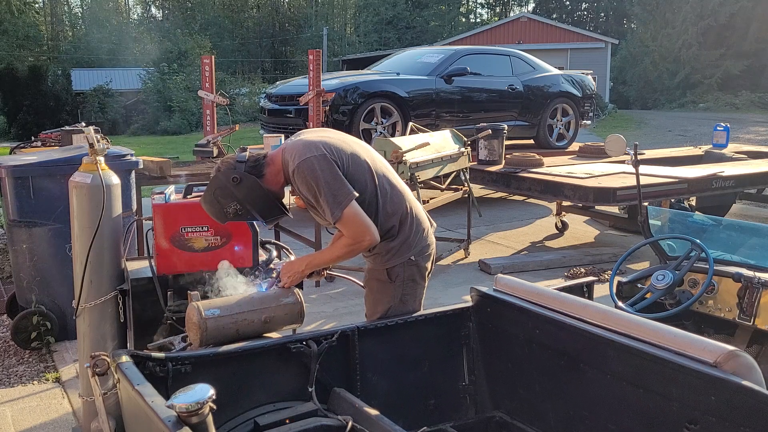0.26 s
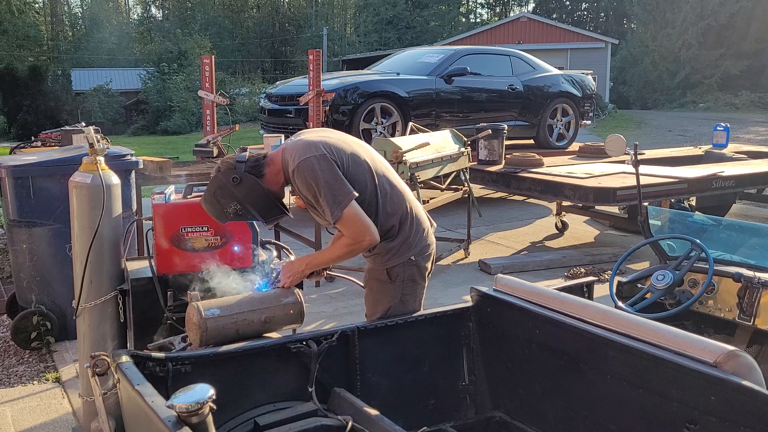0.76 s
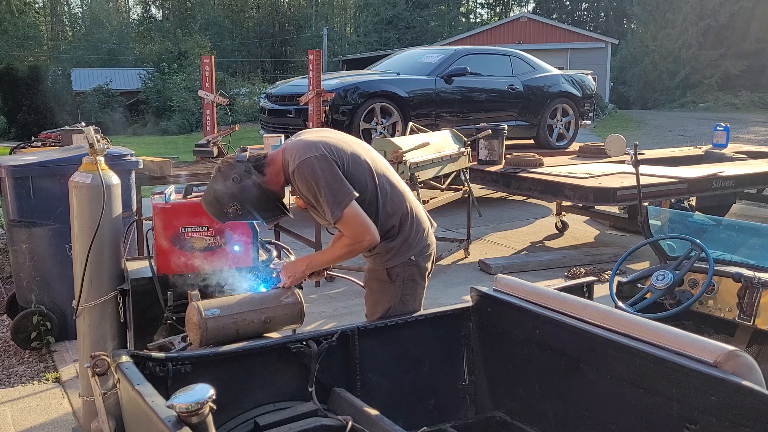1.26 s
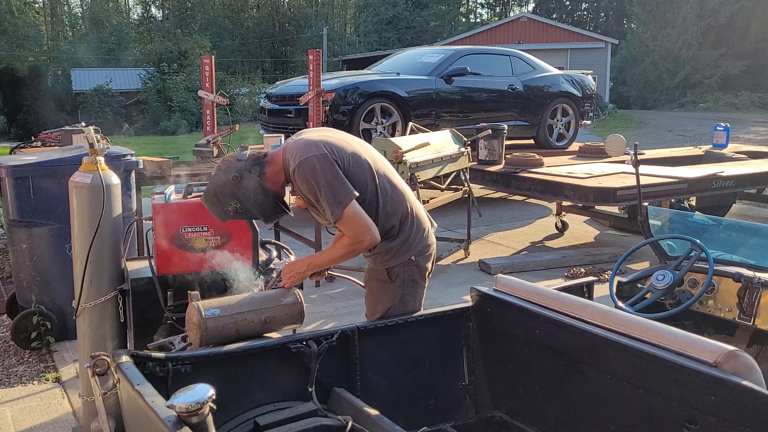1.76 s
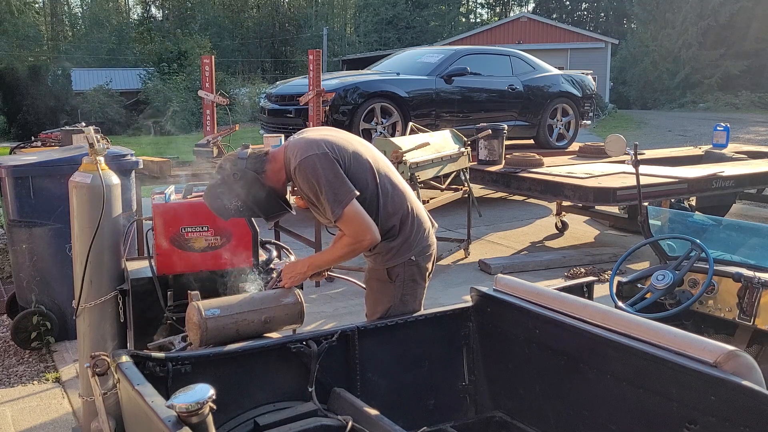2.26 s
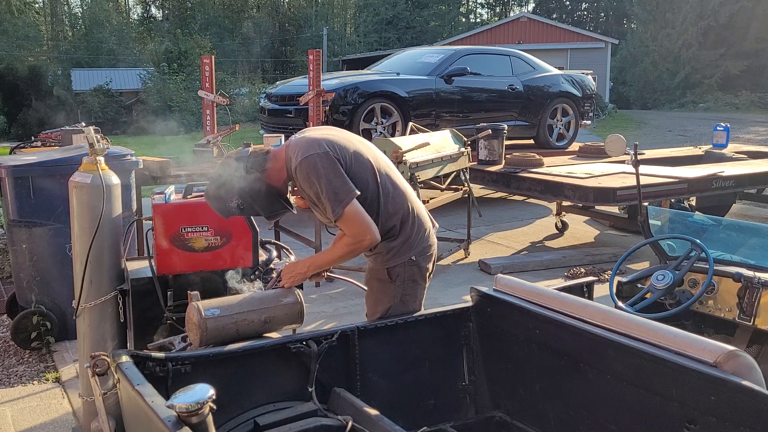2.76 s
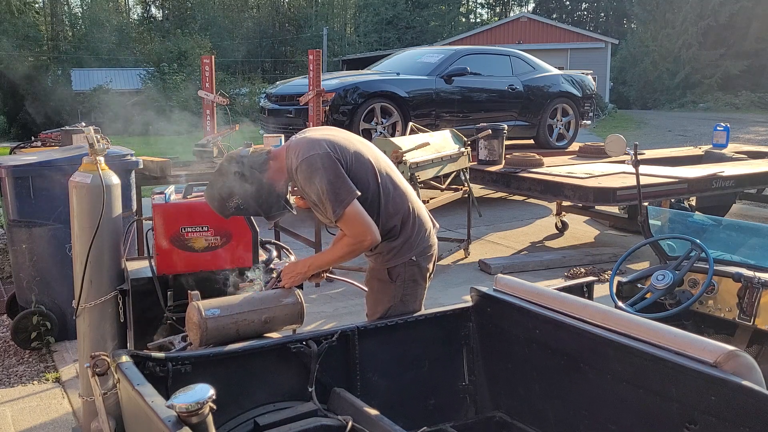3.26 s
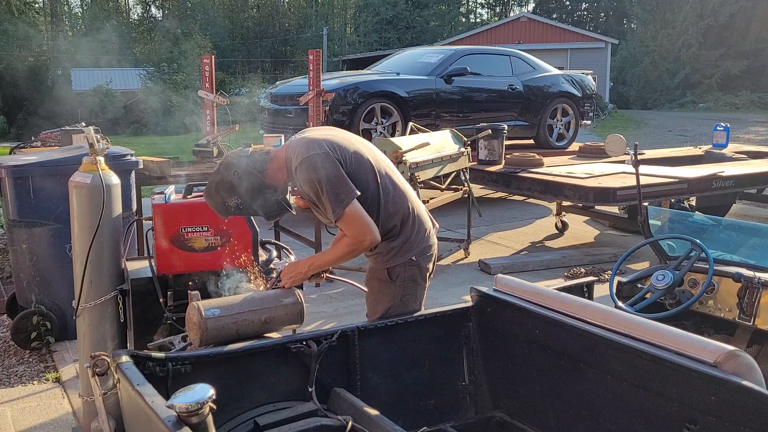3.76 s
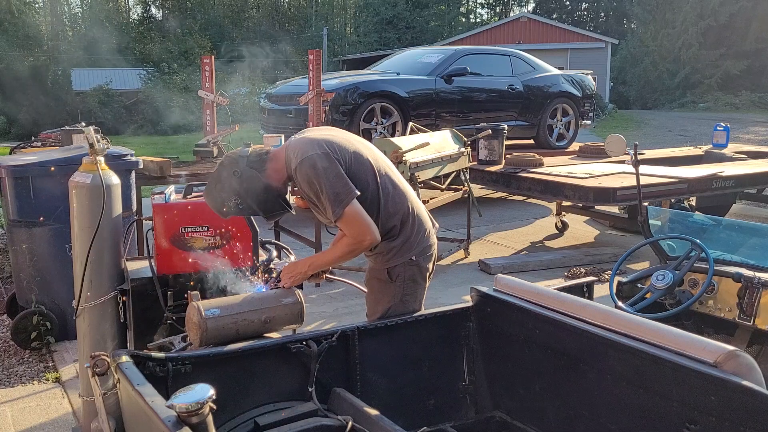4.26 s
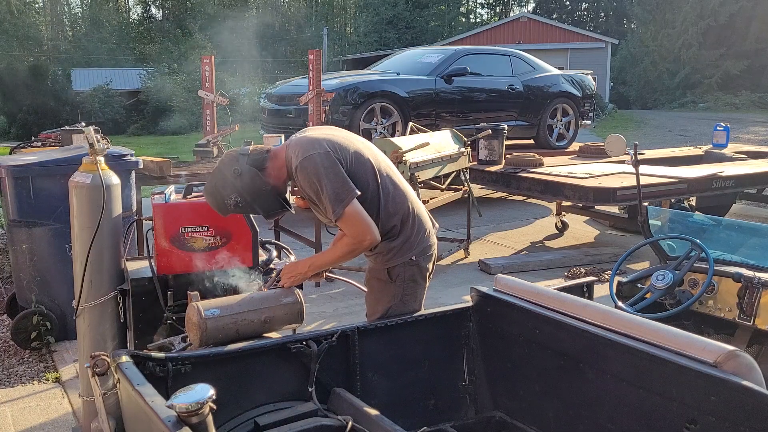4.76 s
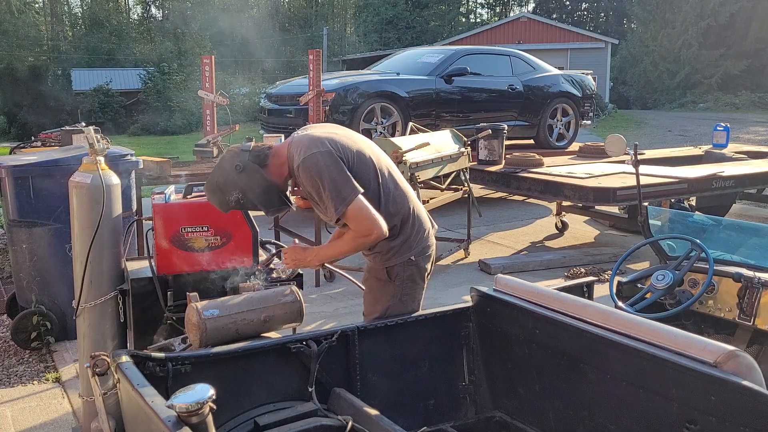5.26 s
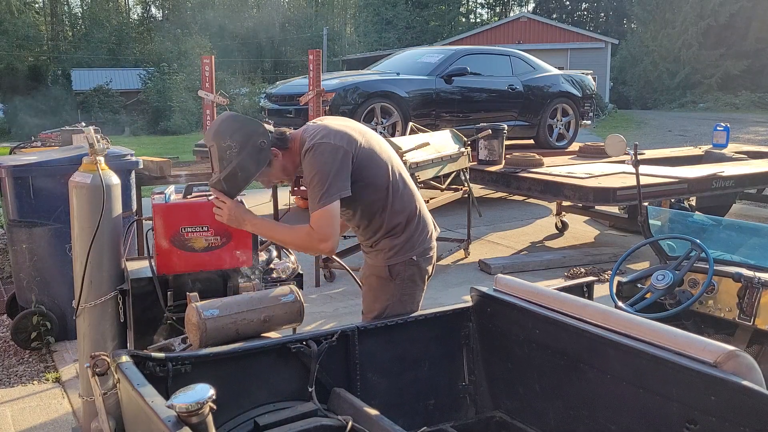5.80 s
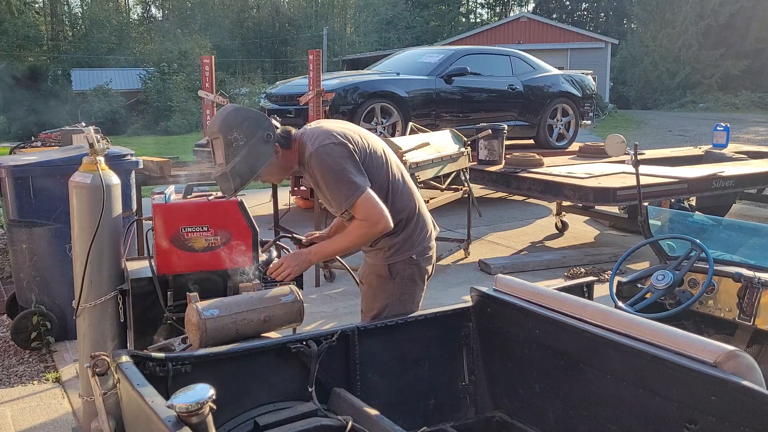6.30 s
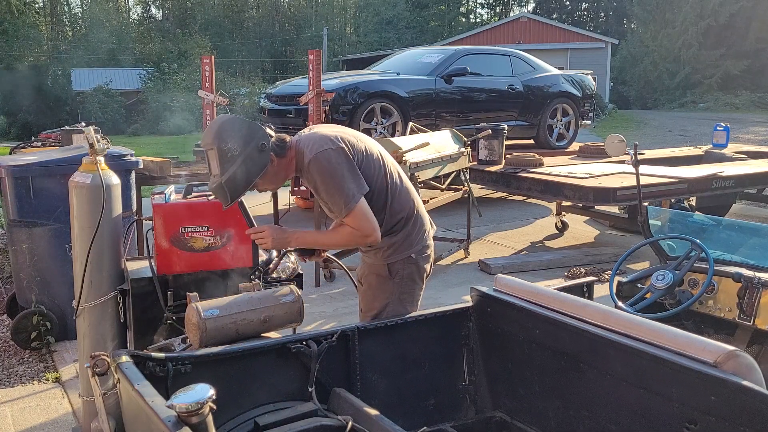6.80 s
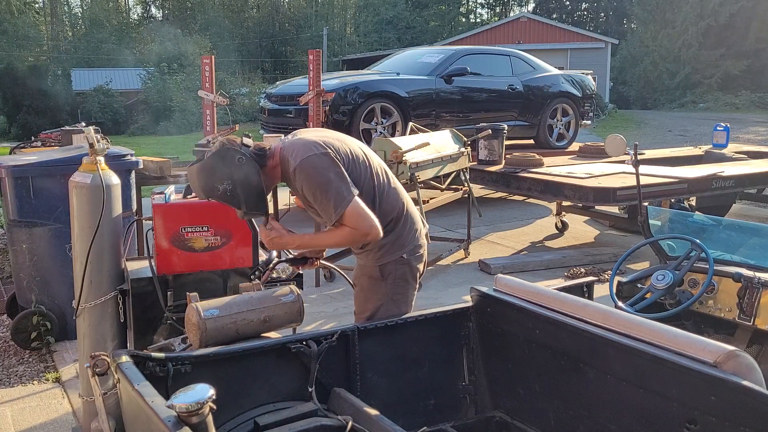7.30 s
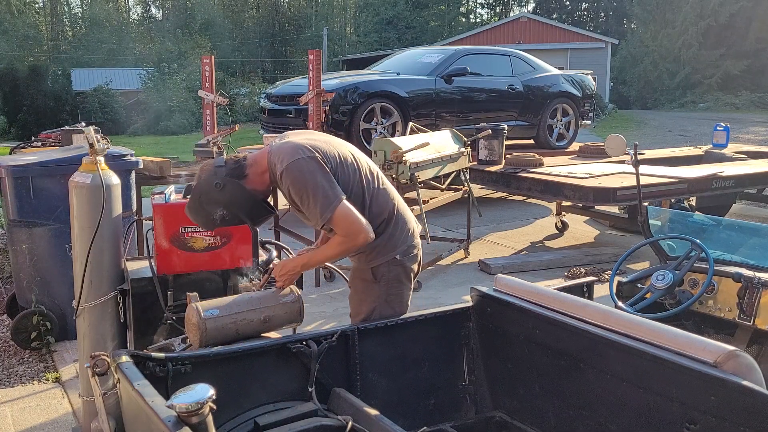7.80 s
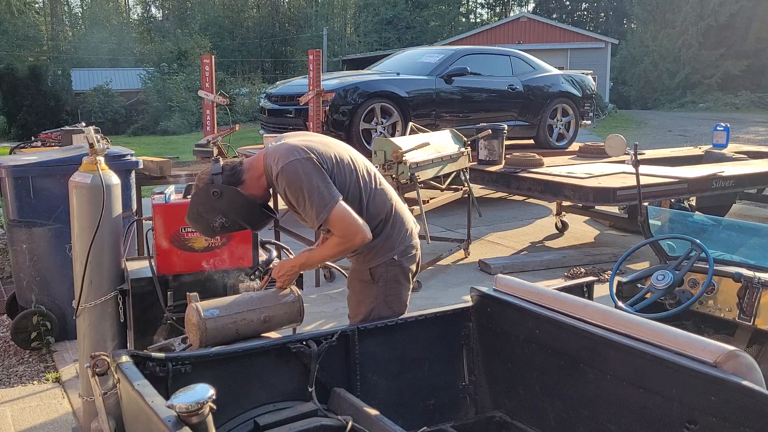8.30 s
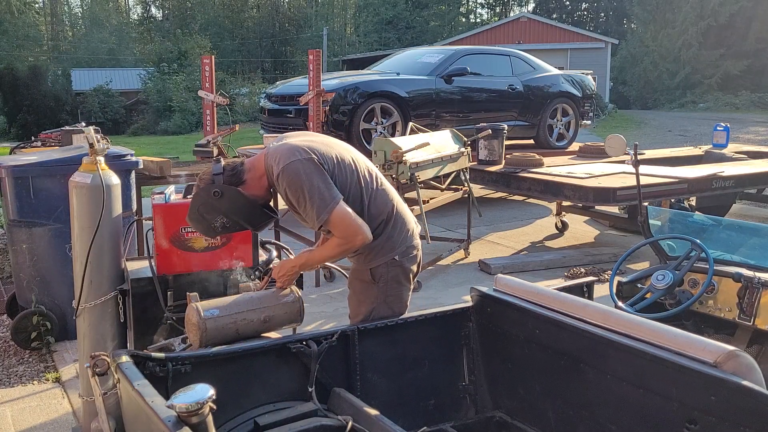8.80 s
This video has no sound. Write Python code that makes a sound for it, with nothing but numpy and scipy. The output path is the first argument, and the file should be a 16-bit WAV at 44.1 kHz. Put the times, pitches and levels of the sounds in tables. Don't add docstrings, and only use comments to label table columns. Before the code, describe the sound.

In an open yard, close stereo microphones hear wire welding slightly left. From 0 to 0.8 s, sharp snaps come about eighty to a hundred per second over grainy sizzle, with a feed-motor whine and sagging fan hum; the hiss fades near 1 s. A loud short restrike comes at 1.23-1.3 s with a soft bench thud. Then fan hum recovers over faint road rumble; tiny rough high chirps sound around 2.7-3.1 s. At 3.2 s metal ticks and a gas spit precede flares, and from 3.5 to 4.55 s a louder bead crackles, strongest near 4.3 s, echoing off ground and clutter. Tyre hiss swells near 3.9 s. Afterwards a distant engine, dropped in pitch, throbs low, swelling from 6 s and booming around 7.2 s with a faint rattle and light ticks. It drones on; a chirp, clicks and gas puff come near 8.9 s.

```python
import sys
import numpy as np
from scipy import signal
from scipy.fft import rfft, irfft, next_fast_len
from scipy.io import wavfile
from scipy.ndimage import uniform_filter1d, map_coordinates

SR = 44100
rng = np.random.default_rng(int(sys.argv[2]) if len(sys.argv) > 2 else 0)


def boost(x):
    u = np.asarray(x, float) / 20
    return 10 ** u


def dump(signal):
    limited = np.clip(np.atleast_2d(signal).T, -1, 1)
    pcm = np.round(limited * 32767).astype(np.int16)
    wavfile.write(sys.argv[1], SR, pcm)


N = 399105
T = np.arange(N) / SR
SIZE = next_fast_len(N + SR)
HZ = np.maximum(np.arange(SIZE // 2 + 1) * SR / SIZE, 1)
DULL = 1 / (1 + (HZ / 3600) ** 4)


def unit(x):
    return x / np.sqrt(np.mean(x ** 2) + 1e-20)


def in_time(rows):
    s, *columns = np.transpose(rows)
    return [np.interp(T, s, c) for c in columns]


def at_hz(points):
    hz, value = np.array(points).T
    return np.interp(np.log(HZ), np.log(hz), value)


def through(x, response):
    return irfft(rfft(x, SIZE) * response, SIZE)[..., :N]


def delay(ms):
    return np.exp(-2j * np.pi * HZ * ms / 1000)


def drift(rate_hz):
    knots_per_s = 40
    knots = rng.standard_normal(int(N / SR * knots_per_s) + 2)
    r = np.exp(-2 * np.pi * rate_hz / knots_per_s)
    smooth = unit(signal.lfilter([1], [1, -r], knots))
    return np.interp(T * knots_per_s, np.arange(len(knots)), smooth)


def fade(t60_s):
    return [1], [1, -boost(-60 / (t60_s * SR))]


def tones(hz, orders, wobble_db):
    spread_rad = .24
    turn = 2 * np.pi * np.cumsum(hz) / SR
    out = 0
    for k, db in orders:
        out = out + boost(db + wobble_db * drift(6.5)) * np.sin(k * turn + spread_rad * k * k)
    return np.sqrt(2) * out


def snaps():
    # t/s, peak level/dB
    first_bead = [(0.0023, -10.1), (0.0223, -10.2), (0.0374, -10.8), (0.0553, -10.7), (0.07, -11.8),
                  (0.09, -9.4), (0.0992, -11.9), (0.1084, -8.8), (0.122, -13.3), (0.1366, -15.1),
                  (0.1512, -14.2), (0.1635, -14.1), (0.1711, -15.6), (0.1826, -16.1), (0.193, -14.3),
                  (0.202, -14.5), (0.2136, -18.7), (0.2266, -16.9), (0.2369, -12.8), (0.2462, -17.9),
                  (0.2622, -12.6), (0.2767, -14.6), (0.2909, -14.0), (0.3052, -12.3), (0.32, -16.3),
                  (0.3374, -14.3), (0.3521, -16.6), (0.3674, -13.5), (0.3835, -15.3), (0.4025, -15.2),
                  (0.4208, -13.9), (0.4378, -19.0), (0.4459, -21.6), (0.4559, -19.0), (0.467, -21.0),
                  (0.4806, -18.9), (0.4916, -13.8),
                  (0.5005, -19.1), (0.5069, -19.2), (0.5168, -14.3), (0.5228, -16.1), (0.5311, -17.9),
                      (0.5416, -11.1), (0.5547, -15.6), (0.5638, -16.2), (0.5739, -14.4), (0.5815, -15.2),
                      (0.5911, -15.6), (0.603, -6.8), (0.6115, -12.1), (0.6192, -16.5), (0.6312, -12.9),
                      (0.6389, -15.9), (0.65, -15.5), (0.6579, -14.2), (0.6681, -13.5), (0.6748, -15.6),
                      (0.6863, -12.1), (0.6925, -13.6), (0.7015, -14.7), (0.7103, -17.4), (0.7217, -14.9),
                      (0.7308, -13.7), (0.7425, -14.8), (0.7493, -16.8), (0.7604, -15.3), (0.7724, -13.8),
                      (0.7873, -12.5), (0.8034, -10.4), (0.8229, -13.9), (1.0075, -24.3), (1.0685, -17),
                      (1.2332, -7.1), (1.2494, -6.5), (1.2594, -13.2), (1.2694, -11.3), (1.2791, -10.3),
                      (1.2894, -11.8), (1.2987, -10.9)]
    # t/s, peak level/dB
    second_bead = [(3.3775, -11.2), (3.4256, -21.1), (3.5158, -12.0), (3.553, -10.3), (3.5651, -13.2),
                   (3.5715, -13.1), (3.5776, -14.4), (3.5843, -11.9), (3.5916, -11.9), (3.5989, -14.0),
                   (3.606, -11.8), (3.6128, -11.5), (3.6191, -9.4), (3.6262, -10.6), (3.6338, -13.3),
                   (3.6411, -15.4), (3.6528, -11.4), (3.659, -10.5), (3.6722, -9.6), (3.6879, -7.9),
                   (3.6993, -14.5), (3.714, -12.5), (3.7281, -11.0), (3.7426, -10.0), (3.7617, -7.7),
                   (3.7695, -9.6), (3.7774, -8.5), (3.7902, -14.2), (3.8029, -10.9), (3.8098, -9.8),
                   (3.8176, -11.4), (3.8262, -13.1), (3.8348, -13.4), (3.8433, -9.7), (3.8517, -8.5),
                   (3.8597, -13.2), (3.8682, -10.2), (3.8767, -13.5), (3.885, -10.9), (3.8996, -7.7),
                   (3.9167, -8.0), (3.9497, -8.9), (3.9862, -8.5),
                   (4.0066, -6.8), (4.025, -9.6), (4.0366, -10.8), (4.0526, -8.8), (4.0664, -9.8),
                       (4.0783, -10.3), (4.0883, -11.2), (4.0993, -13.7), (4.1089, -9.8), (4.1199, -9.1),
                       (4.1297, -12.1), (4.1398, -9.5), (4.1496, -8.8), (4.1596, -13.2), (4.1697, -6.8),
                       (4.1805, -6.7), (4.1933, -9.1), (4.205, -9.9), (4.2146, -12.3), (4.2258, -6.6),
                       (4.2359, -5.3), (4.2487, -6.6), (4.2661, -7.9), (4.2847, -3.5), (4.2961, -12.7),
                       (4.3079, -7.1), (4.3168, -13.0), (4.3265, -8.2), (4.3368, -12.9), (4.3457, -12.0),
                       (4.352, -10.7), (4.3641, -15.5), (4.3714, -17.7), (4.3796, -14.4), (4.3906, -15.8),
                       (4.3993, -14.7), (4.4097, -9.2), (4.4192, -11.3), (4.4282, -20.0), (4.4368, -19.2),
                       (4.4424, -17.0), (4.4589, -16.3), (4.4654, -13.1), (4.472, -17.4), (4.4823, -16.3),
                       (4.4884, -13.6), (4.4942, -15.3), (4.5007, -15.3), (4.5167, -14.0), (4.5246, -17.4),
                       (4.5346, -16.0), (4.5426, -15.1), (4.5549, -10.2)]
    snap_db, twin_share, twin_ms = -2.5, .22, .25
    s, db = np.transpose(first_bead + second_bead)
    clicks, twins = np.zeros((2, N))
    at = np.round(s * SR + rng.uniform(-2.5, 2.5, len(s))).astype(int)
    clicks[at] = boost(db + snap_db)
    late = (rng.uniform(.15, 1, len(s)) * twin_ms / 1000 * SR).astype(int)
    twins[at + late] = clicks[at] * twin_share * rng.standard_normal(len(s))
    return clicks, twins


def burn():
    # t/s, sizzle level/dB
    first_burn = [(0, -32), (.2, -31), (.4, -34.5), (.6, -32), (.83, -33), (.87, -40.5), (.95, -52),
                  (1.02, -40), (1.06, -64), (1.1, -99)]
    # t/s, sizzle level/dB
    restrike = [(1.06, -80), (1.19, -55), (1.229, -44), (1.24, -23), (1.301, -28), (1.35, -46), (1.5, -73),
                (1.701, -99)]
    # t/s, sizzle level/dB
    second_burn = [(3.369, -93), (3.44, -52), (3.56, -26.5), (3.9, -27), (4.2, -32.5), (4.402, -29.5),
                   (4.549, -28.5), (4.601, -51), (4.9, -99)]
    return sum(boost(in_time(rows)[0]) for rows in (first_burn, restrike, second_burn))


def arc():
    # f/Hz, density/(dB per Hz)
    shock_colour = [(250, -12), (1000, -9.5), (1800, -7), (3300, -8.5), (4800, -6.5), (6300, 1), (8300, -1),
                    (9700, .5), (11800, -5), (13600, 1), (15000, 0), (15700, 4)]
    # f/Hz, density/(dB per Hz)
    sizzle_colour = [(300, -26), (1000, -20), (2000, -20), (3400, -13), (4800, -14.5), (9000, -13),
                     (11800, -10), (13200, -9), (15000, -12), (15700, -8)]
    # t/s, gain/dB
    puddle = [(0, -2.5), (.2, -0.5), (.4, -1), (.6, -3), (.82, 0.5), (1.0, 1), (1.07, 1), (1.23, 6),
              (1.3, 4), (3.38, 2), (3.6, 0), (3.8, 0.5), (4.0, 2), (4.15, 0), (4.28, 1), (4.4, -0.5),
              (4.5, 1), (4.54, 4)]
    # t/s, level/dB, rise/s, t60/s, tilt/(dB per octave)
    flares = [
        (.915, -40, 0.0092, 0.39, 6.5),
        (1.009, -50, .002, .08, -9),
        (1.07, -45, 0.0033, 0.12, -2.5),
        (1.193, -34, 0.016, 0.23, 1),
        (3.387, -24.5, 0.002, 0.14, 0.5),
        (3.526, -19.5, 0.0028, 0.058, -0.5),
    ]
    clicks, twins = snaps()
    shock = 1j * boost(at_hz(shock_colour) + 10.5)
    shocks = through(clicks + twins, shock * (1 - DULL))
    push = np.sqrt(clicks * boost(-15)) * boost(in_time(puddle)[0])
    shocks = shocks + through(push, shock * DULL)

    stirred = signal.lfilter(*fade(.045), np.roll(clicks, -60) + 1e-18)
    stirred = uniform_filter1d(stirred, size=120)
    upcoming = np.roll(clicks, -90)[::-1] > 0
    shorted = signal.lfilter(*fade(.035), upcoming + 1e-18)[::-1]
    flicker_db = 1.5 * drift(12)
    level = burn() * boost(flicker_db - 6.5) + boost(-18.0) * stirred

    grit = boost(2.8 * np.minimum(rng.exponential(1, N), 5))
    common, left, right = rng.standard_normal((3, N)) * grit
    spread = common + .95 * np.array([left, right])
    sizzle = level * unit(through(spread, boost(at_hz(sizzle_colour))))
    smooth = spread / np.sqrt(grit)
    for start, db, rise, t60, tilt_db in flares:
        colour_db = at_hz(sizzle_colour) + tilt_db * np.log2(HZ / 12000)
        puff = unit(through(smooth, boost(colour_db)))
        t = np.maximum(T - start, 0)
        sizzle += puff * boost(db - 60 * t / t60) * (1 - np.exp(-t / rise))
    return shocks + sizzle * (1 - .7 * np.clip(shorted, 0, 1))


def valve():
    # t/s, level/dB
    openings = [
        (3.2135, -38),
        (8.927, -36.5),
    ]
    # f/Hz, density/(dB per Hz)
    jet_colour = [(2000, -63), (6500, -16.5), (8500, -16.5), (11500, -23), (14500, 0.5), (16500, -9)]
    # f/Hz, density/(dB per Hz)
    gas_colour = [(1500, -12), (4000, -10), (7000, -9), (9500, -5), (12000, -8.5), (15500, -6)]
    gas_db, gas_rise_s, gas_flows_s = -61, 0.025, 1.4
    jet = unit(through(rng.standard_normal(N), boost(at_hz(jet_colour))))
    out = flowing = 0
    for start, db in openings:
        t = np.maximum(T - start, 0)
        burst_db = db - 60 * np.maximum(t - .022, 0) / 0.059
        out = out + jet * boost(burst_db) * (1 - np.exp(-t / 0.0005))
        flowing = flowing + np.clip((T - start) / gas_rise_s, 0, 1) * (T < start + gas_flows_s)
    gas = unit(through(rng.standard_normal((2, N)), boost(at_hz(gas_colour))))
    return out + boost(gas_db) * flowing * gas


def paths(rows):
    right_lag_ms = .085
    left = sum(g * delay(ms) for ms, g, _ in rows)
    right = sum(g * delay(ms + right_lag_ms) for ms, _, g in rows)
    return np.array([left, right])


def yard(source, scatter_db, scatter_t60, far_db, far_t60):
    # delay/ms, left gain/1, right gain/1
    echoes = [(-.12, -.3, -.28), (0, 1.0, .7), (.18, .5, .36), (.31, -.5, -.36), (.8, .16, .2),
              (.98, .12, .05), (1.6, -.15, -.1), (2.06, -.2, -.14), (2.2, .92, .6), (2.38, .2, .2),
              (2.5, -.28, -.2), (2.86, .24, .16), (3.15, .15, -.12), (3.4, .16, .1), (4.18, .16, .1),
              (4.76, -.18, -.12), (6.02, .14, -.1), (6.52, -.2, .06)]
    # t/s, level/dB
    shading = [(0, 3), (.3, -4.5), (.7, -4), (.8, -1), (1.2, -1), (3.4, 2.5), (3.75, -1.5), (4.1, -3.5),
               (4.3, -9.5), (4.6, -2)]
    # f/Hz, gain/dB
    edge_colour = [(5000, 0), (6900, 3.5), (8900, -6), (10300, 0), (11300, 2), (12800, 3), (14800, 4)]
    ground_from_ms, ground_right_lag_ms, wander_ms = 2.0, .013, .022
    near = through(source, paths([p for p in echoes if p[0] < ground_from_ms]))
    echo = paths([p for p in echoes if p[0] >= ground_from_ms])
    echo = echo * [delay(0), delay(ground_right_lag_ms)]
    ground = through(source, echo * DULL * boost(-1) * delay(-.05))
    bright = through(source * boost(in_time(shading)[0]), echo * (1 - DULL) * boost(at_hz(edge_colour)))
    moved = np.arange(N) + wander_ms / 1000 * SR * drift(6)
    ground += [map_coordinates(row, [moved], order=3) for row in bright]

    t = T[:SR // 2]
    decay = boost(scatter_db - 60 * t / scatter_t60) + boost(far_db - 60 * t / far_t60)
    tails = rng.standard_normal((2, 2, len(t))) * decay * (t > .0004) * boost([[0], [-2.5]])
    one, other = rfft(tails, SIZE) * (1 - .55 * DULL)
    turn = 2 * np.pi * 2.3 * T
    return near + ground + through(source * np.cos(turn), one) + through(source * np.sin(turn), other)


def feeder():
    # from t/s, to t/s
    feeding = [
        (-1, .85),
        (1.2, 1.35),
        (3.5, 4.58),
    ]
    feed_hz, feed_db = 271.6, -58.5
    running = sum((T >= a) * (T < b) for a, b in feeding) * 1.
    running = uniform_filter1d(running, size=2000)
    hz = feed_hz * (1 + 0.0057 * drift(5.4))
    return running * boost(feed_db) * tones(hz, [(0.97, 0)], wobble_db=3.0)


def fan():
    # from t/s, to t/s, fan sag/Hz
    loads = [
        (-1, .95, 25),
        (.95, 1.2, 16),
        (1.2, 1.36, 30),
        (3.21, 3.6, 15),
        (3.6, 4.6, 37),
        (8.93, 9.1, 14),
    ]
    # multiple/1, level/dB
    blades = [(2, 0.27), (3, -11)]
    fan_hz, fan_db, overtone_db, lag_s = 256.4, -48.5, -2.5, 0.0696
    sag_db_per_hz, overtone_sag_db_per_hz = 0.02, 0.5
    r = np.exp(-1 / (lag_s * SR))
    load = sum(sag * (T >= a) * (T < b) for a, b, sag in loads)
    sag = signal.lfilter([1 - r], [1, -r], load, zi=[r * load[0]])[0]
    flutter = 0.00173 + 0.00059 * sag
    hz = (fan_hz - sag) * (1 + flutter * drift(4.38))
    overtones = boost(overtone_db - overtone_sag_db_per_hz * sag) * tones(hz, blades, wobble_db=2.0)
    blade_tone = tones(hz, [(1, 0.014)], wobble_db=1.5)
    return boost(fan_db - sag_db_per_hz * sag) * (blade_tone + overtones)


def engine():
    # t/s, cycle f/Hz, firing level/dB, boom level/dB, booming order/1
    passing = [(0, 35.1, -54.5, -62, 4.6), (1.0, 37.46, -57.5, -80, 5.4), (1.56, 34.84, -60, -77, 4.5),
               (2.49, 34.76, -59.5, -92, 5.2), (2.72, 35.49, -45, -78, 5.3), (3.4, 35.47, -43.5, -66, 5.1),
               (3.8, 35.95, -50, -61, 4.6), (4.68, 35.66, -46, -64, 3.5), (4.95, 28.9, -47.5, -60.5, 3.8),
               (5.45, 28.8, -49, -54.5, 4.4), (6.14, 28.43, -37, -43.5, 5.0),
               (6.28, 28.41, -36.5, -52, 3.3), (6.58, 28.43, -37, -42.5, 3.9), (6.78, 28.16, -36, -35, 5.3),
               (7.25, 27.52, -40.5, -30.5, 5.3), (7.95, 27.83, -44, -43, 5.2),
               (8.5, 27.13, -36.5, -50.5, 5.1), (9.05, 28.35, -33.5, -45, 5.1)]
    # multiple/1, level/dB
    firing = [(1, -29), (2, 0)]
    # multiple/1, level/dB
    low_boom = [(3, 1.7), (4, 3.5)]
    # multiple/1, level/dB
    mid_boom = [(5, 0.17)]
    # multiple/1, level/dB
    high_boom = [(6, 0.3), (7, -14.5), (8, -15.5), (10, -21), (12, -17)]
    centres = (4, 5, 6)
    boom_fall_db = 11.0
    rattle_hz, rattle_db, rattle_at_s, rattle_span_s = 3750, -64, 7.04, 0.22
    throb_per_s, throb_db, throb_peak_s = 6.3, 1.5, 5.6
    hz, firing_db, boom_db, booming = in_time(passing)
    hz = hz * (1 + .008 * drift(3))
    band = 1 / (1 + ((HZ - rattle_hz) / 350) ** 2)
    rattle = unit(through(rng.standard_normal(N), band))
    away = np.minimum(np.abs(T - rattle_at_s) / rattle_span_s, 2)
    out = boost(rattle_db - 12 * away + 2.0 * drift(15)) * rattle
    uneven_db = throb_db * np.cos(2 * np.pi * throb_per_s * (T - throb_peak_s)) * (hz < 30)
    out += boost(firing_db + uneven_db) * tones(hz, firing, wobble_db=1.5)
    for centre, orders in zip(centres, (low_boom, mid_boom, high_boom)):
        db = boom_db - boom_fall_db * np.abs(booming - centre)
        out += boost(db) * tones(hz, orders, wobble_db=2.0)
    return out


def small_sounds():
    # t/s, length/s, start f/Hz, end f/Hz, level/dB
    chirps = [
        (2.41, .05, 7900, 7600, -80),
        (2.745, .035, 7300, 6000, -68),
        (2.8, .04, 7100, 6000, -72),
        (2.85, .03, 6200, 6500, -75),
        (2.905, .025, 6000, 6500, -73),
        (2.93, .025, 6500, 5800, -69),
        (2.955, .025, 6200, 6600, -72),
        (2.975, .05, 6600, 5700, -69),
        (3.025, .04, 5800, 6000, -73),
        (8.87, .06, 7100, 7100, -68),
    ]
    # t/s, level/dB, ring f/Hz, t60/s
    ticks = [(3.216, -46, 2000, .1), (3.217, -50, 3000, .08), (3.226, -45, 1300, .09),
             (3.24, -51, 2200, .1), (5.627, -50, 2000, .03), (5.705, -62, 5500, .02), (7.1, -62, 4900, .02),
             (7.11, -54, 1500, .03), (7.111, -57, 8000, .05), (7.112, -56, 13000, .04),
             (8.93, -46, 1340, .06), (8.942, -42, 1340, .09), (8.942, -54, 3600, .06)]
    # t/s, level/dB, ring f/Hz, t60/s
    thuds = [
        (1.236, -39, 236.4, 0.41),
        (1.27, -45.5, 150, 0.504),
        (1.238, -42, 298, 0.41),
        (3.58, -43, 144.8, 0.96),
        (3.599, -44, 408, 0.8),
        (4.5, -45.5, 234.6, 0.55),
    ]
    out, t = np.zeros(N + SR), T[:SR // 2]
    for start, length, from_hz, to_hz, db in chirps:
        u = np.clip(t / length, 0, 1)
        hz = from_hz + (to_hz - from_hz) * u + 900 * rng.standard_normal(len(t))
        chirp = np.sin(np.pi * u) * np.sin(2 * np.pi * np.cumsum(hz) / SR)
        out[round(start * SR):][:len(t)] += boost(db + 5.0) * chirp
    for start, db, hz, t60 in ticks + thuds:
        band = signal.butter(1, [hz / 1.3, hz * 1.3], "band", fs=SR, output="sos")
        clatter = unit(signal.sosfilt(band, rng.standard_normal(len(t))))
        ring = np.sin(2 * np.pi * hz * t) + .7 * clatter
        out[round(start * SR):][:len(t)] += boost(db - 60 * t / t60) * ring
    return np.array([out[:N], boost(-2.5) * np.roll(out, 2)[:N]])


def wide_noise(spectrum):
    # f/Hz, correlation/1
    likeness = [(200, 1), (400, 0.87), (700, 0.17), (1500, 0.32), (4000, 0.043)]
    alike = np.clip(at_hz(likeness), 0, 1)
    mid, side = rfft(rng.standard_normal((2, SIZE)))
    pair = np.sqrt(1 + alike) * mid + np.sqrt(1 - alike) * side * [[1], [-1]]
    return unit(irfft(pair * boost(at_hz(spectrum)), SIZE)[:, :N])


def road():
    # t/s, level/dB
    traffic = [(0, -57), (1.2, -60), (1.6, -74.5), (2.1, -72.5), (2.8, -69), (3.15, -73.5), (3.9, -49.5),
               (4.9, -73), (5.2, -74.5), (5.65, -65.5), (6.8, -64), (7.06, -56.5), (7.4, -64.5), (8.9, -63)]
    # f/Hz, density/(dB per Hz)
    rumble_colour = [(25, -11.5), (60, -7.5), (110, -16), (200, -14), (300, -12.5), (500, -16), (800, -17),
                     (1500, -26.5), (2500, -36), (5000, -85)]
    # f/Hz, density/(dB per Hz)
    hiss_colour = [(530, -22), (900, -7), (1380, -14.5), (2330, -11), (3880, -13), (6620, -22),
                   (8150, -31.5), (15200, -34), (15900, -63), (16500, -61.5)]
    # f/Hz, density/(dB per Hz)
    air_colour = [(300, -27), (2000, -11), (6500, 3.5), (8000, -4), (12000, -5), (16500, -11)]
    hiss_db, = in_time(traffic)
    rumble_db = -44.5 + 0.24 * (hiss_db - traffic[-1][1])
    rumble = boost(rumble_db + 0.59 * drift(3.5)) * wide_noise(rumble_colour)
    hiss = boost(hiss_db + 1.0) * wide_noise(hiss_colour)
    return rumble + hiss + boost(-75) * wide_noise(air_colour)


def ducking():
    # from t/s, to t/s, gain/dB
    ducks = [
        (-1, 2.35, -5),
        (3.5, 5.35, -7),
    ]
    in_s, out_s = 0.072, 0.54
    return boost(sum(np.interp(T, [a, a + in_s, b, b + out_s], [0, db, db, 0]) for a, b, db in ducks))


def scene():
    # f/Hz, gain/dB
    right_shade = [(6500, 1.5), (8000, 1), (9300, -0.5), (10500, -5.5), (12400, 2), (14500, -2)]
    # f/Hz, phase/rad
    right_turn = [(2700, 0), (3300, .5), (5300, 0), (6900, 1.1), (8400, 0)]
    # f/Hz, phase/rad
    left_lead = [(60, 0.56), (260, 0.5), (400, -1.5), (515, 1.02), (700, -0.3), (1000, 2.5), (1600, 4),
                 (2800, 2.5), (3600, 1.5)]
    # f/Hz, level/dB
    left_excess = [(60, -0.8), (140, 1), (260, 2), (500, -0.3), (700, 1.5), (1600, 1.7), (4000, 3)]
    weld = yard(arc() + valve(), scatter_db=-28.5, scatter_t60=.045, far_db=-41.5, far_t60=.29)
    weld[1] = through(weld[1], boost(at_hz(right_shade)) * np.exp(-1j * at_hz(right_turn)))
    far = engine() + feeder() + (fan() + road()) * ducking()
    half = boost(at_hz(left_excess) / 2) * np.exp(.5j * at_hz(left_lead))
    return weld + small_sounds() + through(far, np.array([half, 1 / half]))


def band_limit(x):
    return signal.sosfilt(signal.butter(12, 17000, fs=SR, output="sos"), x)


def record(dry):
    cutoff_hz = 15830
    x = signal.sosfilt(signal.butter(3, 38, "high", fs=SR, output="sos"), dry)
    steep = .96 / (1 + (HZ / cutoff_hz) ** 400)
    skirt = .04 / (1 + (HZ / cutoff_hz / 1.03) ** 200)
    return band_limit(through(x, steep + skirt))


dry = scene()
out = record(dry)
dump(out)
```